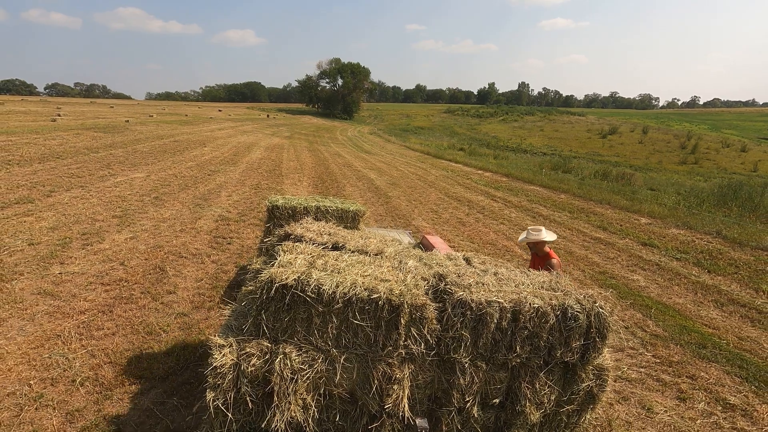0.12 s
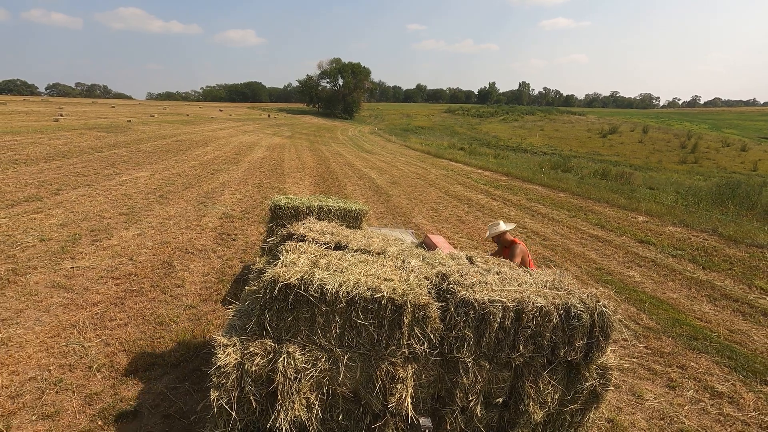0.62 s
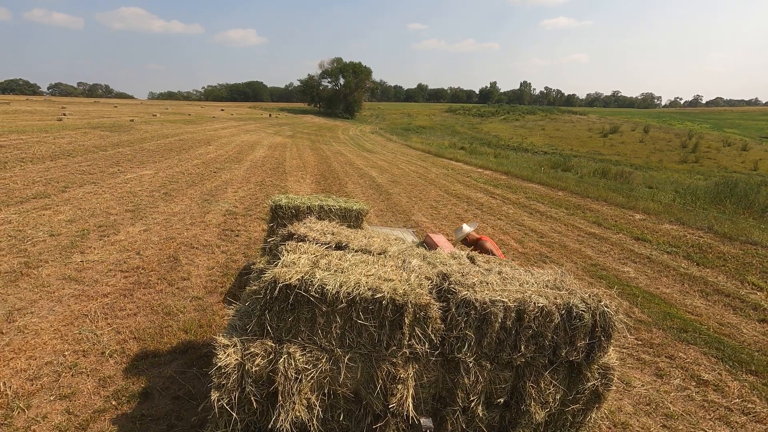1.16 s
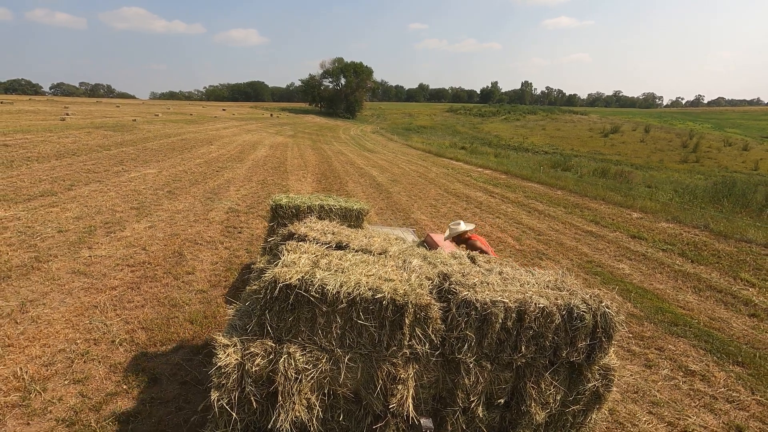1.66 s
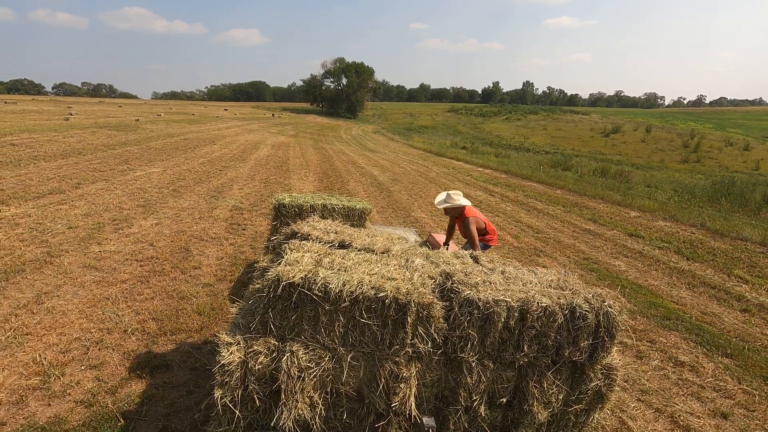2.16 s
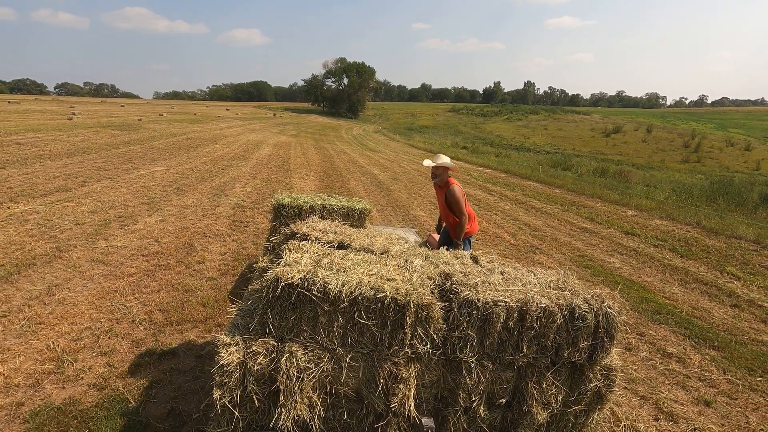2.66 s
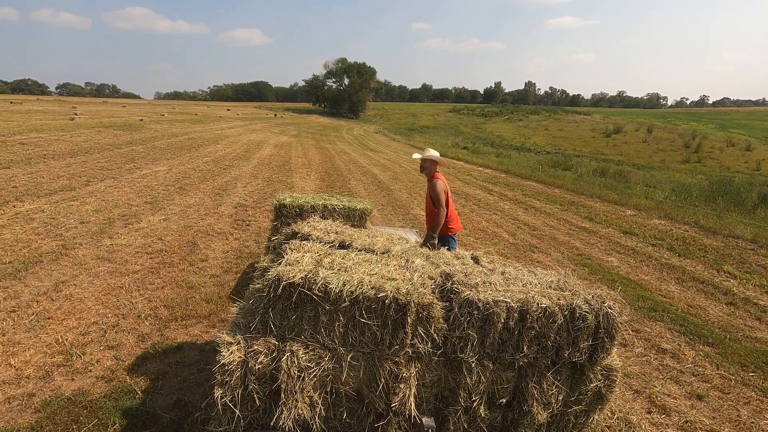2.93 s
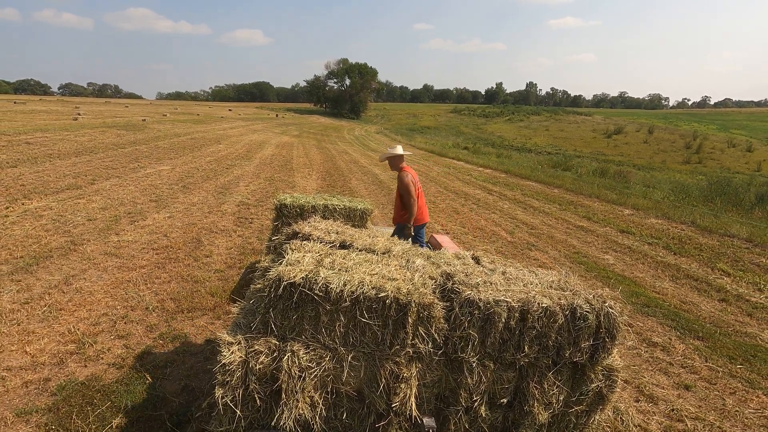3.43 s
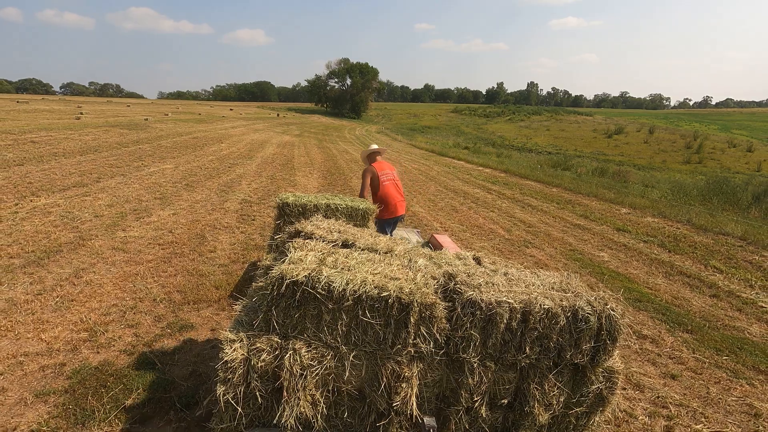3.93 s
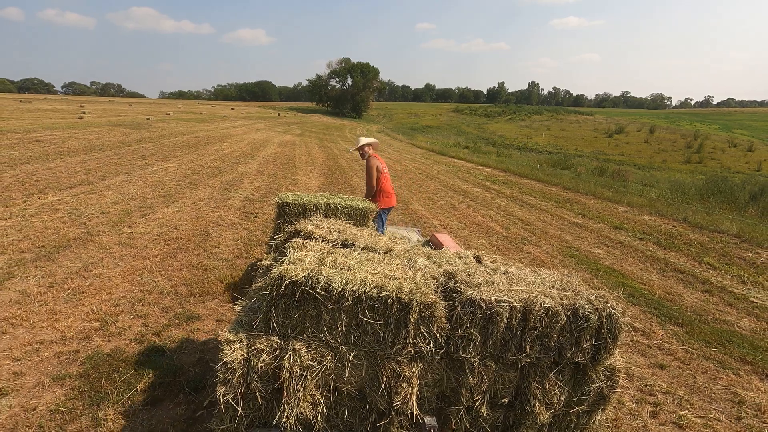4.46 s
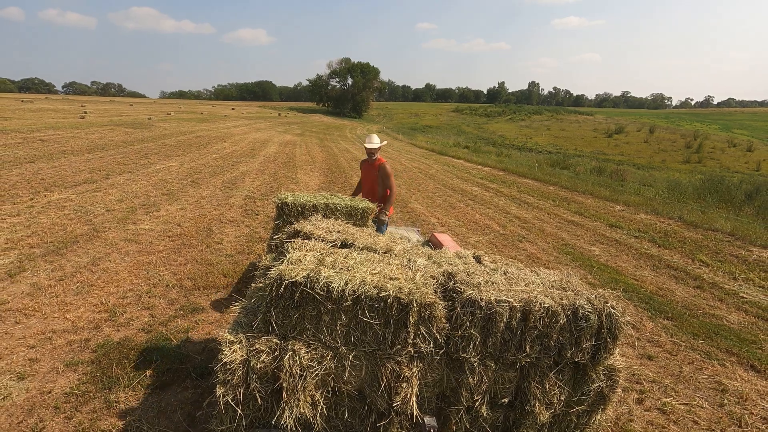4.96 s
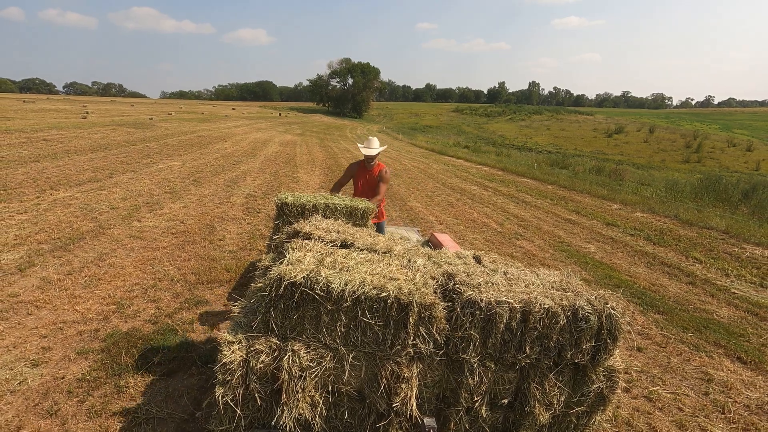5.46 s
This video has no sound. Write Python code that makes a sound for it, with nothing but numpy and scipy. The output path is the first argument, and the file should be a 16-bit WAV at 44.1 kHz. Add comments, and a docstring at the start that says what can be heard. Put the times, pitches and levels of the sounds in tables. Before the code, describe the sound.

Steady low diesel chug with knocking and clatter, wind rumbling in gusts, dry straw rustling and a few dull wooden thuds.

```python
"""A six-cylinder diesel tractor crawls across a stubble field at low revs, heard from on board.
A gust of low noise opens over the exhaust's firing harmonics, knocking block modes and fan hum and roar;
a wagon board rings at 0.6 s, hay crackles louder from 1 s and the wind gusts again near 1.8 and 4.1 s.
At 4.5 s the load pulls the engine down most, as boards ring and straw snaps in short noise bursts;
a last gust and wagon knock come near 5.5 s."""
import sys
import numpy as np
from scipy import signal
from scipy.fft import rfft, irfft
from scipy.io import wavfile

SR = 44100
rng = np.random.default_rng(int(sys.argv[2]) if len(sys.argv) > 2 else 0)


def wav_record(signal):
    """Record a signal, one row per channel, as 16-bit PCM in the file named by sys.argv[1]."""
    frames = np.transpose(np.atleast_2d(signal))
    bounded = np.clip(frames, -1, 1)
    # unit amplitude maps onto the largest positive 16-bit level
    quanta = np.round(bounded * 32767).astype(np.int16)
    wavfile.write(sys.argv[1], SR, quanta)


def volts(x):
    """Linear amplitude factor 10**(x/20) for a level x in dB, scalar or array-like."""
    e = np.asarray(x, float) / 20
    return 10 ** e


N = 246519  # samples


def rms_one(x):
    """Normalisation: scale a signal to unit rms."""
    return x / np.sqrt(np.mean(x ** 2) + 1e-30)


def colour(x, spectrum):
    """Linear filtering: weight the spectrum of x; unit white noise takes on the given dB per Hz."""
    hz, db = np.transpose(spectrum)
    bins_hz = np.maximum(np.arange(N // 2 + 1) * SR / N, 1)
    gain = volts(np.interp(np.log(bins_hz), np.log(hz), db))
    return irfft(rfft(x) * gain, N) * np.sqrt(SR / 2)


def drift(rate_hz):
    """Low-pass random process: slow chance of spread 1, from two equal poles at rate_hz."""
    pole = np.exp(-80 * np.pi * rate_hz / SR)  # runs at one value per 40 samples
    noise = rng.standard_normal(N // 40 + 2002)
    slow = signal.lfilter([1], [1, -2 * pole, pole * pole], noise)[2000:]
    return np.interp(np.arange(N) / 40, np.arange(len(slow)), rms_one(slow))


def swells(rows, rise_s, fall_s):
    """Superposition: bell-shaped swells at (peak time, height), summed to one value per sample."""
    rows = np.array(rows)
    lag = np.arange(N) / SR - rows[:, :1]
    return rows[:, 1] @ np.exp(-.5 * (lag / np.where(lag < 0, rise_s, fall_s)) ** 2)


def ring(clicks, hz, t60):
    """Damped resonance: a unit click sets a sine of height 1 ringing, down 60 dB after t60 seconds."""
    r, w = volts(-60 / (t60 * SR)), 2 * np.pi * hz / SR
    return signal.lfilter([0, np.sin(w)], [1, -2 * r * np.cos(w), r * r], clicks + 1e-18)


# Wind noise spectrum. Each row: frequency in Hz, relative density in dB per Hz.
WIND_SPECTRUM = [(10, -12), (30, 0), (55, -6), (130, -6.5), (250, -14), (1000, -70)]
# Gusts over a light breeze. Each row: peak time in seconds, rise above the breeze in dB,
# bell width (standard deviation) in seconds.
GUSTS = [(0, 11.5, 0.1), (1.8, 10, .22), (3.7, 4, 0.2), (4.12, 11.5, 0.14), (5.41, 11.5, 0.12)]


def wind():
    """Turbulent pressure at the microphone: lumpy low noise under slow random level changes."""
    breeze_db = -40.5
    width_s = np.array(GUSTS)[:, 2:]
    level_db = breeze_db + swells(GUSTS, width_s, width_s) + 2.0 * drift(2.1)
    return volts(level_db) * rms_one(colour(rng.standard_normal(N), WIND_SPECTRUM))


# Straw colouring. Each row: frequency in Hz, relative weight in dB.
STRAW = [(1500, -60), (3000, -30), (6000, -28), (8600, -28), (9450, -41), (9900, -35), (13900, -37),
         (14100, -43), (15200, -52)]
# The hay shifts. Each row: peak time in seconds, rise above the steady rustle in dB.
SHIFTS = [(.1, 5), (1.05, 9), (2.7, 9.5), (4.05, 4.5), (4.95, 7.5), (5.3, 3.5)]
# Straw snaps. Each row: start in seconds, level in dB ahead of the straw colouring.
SNAPS = [(0.5412, -61), (1.2092, -63), (1.5384, -61), (2.026, -60), (2.254, -62), (2.4928, -63),
         (3.205, -61), (3.4032, -61), (3.44, -63), (3.8445, -58), (4.3915, -56), (4.435, -61), (4.59, -62),
         (4.606, -63), (4.7611, -62), (4.8115, -58), (4.8544, -60), (4.9422, -63)]


def hay(grains_per_s=6000, spread_db=2.5, snap_decay_s=.004, crest_db=6):
    """Shot noise: stalks crackle densely in clumps; the loudest snap as short decaying noise bursts."""
    steady_db, rise_s, settle_s = -83, 0.16, 0.19  # level ahead of the straw colouring
    grain_db = spread_db * np.minimum(rng.exponential(1, N), 5)
    grains = (rng.random(N) < grains_per_s / SR) * volts(grain_db) * rng.choice([-1, 1], N)
    level_db = steady_db + swells(SHIFTS, rise_s, settle_s) + 3.5 * drift(22)
    rustle = volts(level_db) * rms_one(grains)
    starts = np.zeros(N)
    starts[[round(s * SR) for s, db in SNAPS]] = volts(np.array(SNAPS)[:, 1] - crest_db)
    envelope = signal.lfilter([1], [1, -np.exp(-1 / (snap_decay_s * SR))], starts)
    bursts = envelope * rng.standard_normal(N)
    return colour(rustle + bursts, STRAW)


# Short bursts of rustle. Each row: peak time in seconds, rms level at the peak in dB,
# centre frequency in Hz, bell width (standard deviation) in seconds.
PUFFS = [(1.612, -46, 3650, .011), (1.63, -57, 4800, .015), (2.03, -61, 5500, .006),
         (3.41, -59, 5300, .014), (3.445, -61, 5500, .012), (3.85, -58, 5400, .005),
         (4.613, -57, 5900, .008)]


def puffs(grains_per_s=5000):
    """Band-limited shot noise: soft-edged bursts of dense crackle, each in one band."""
    out, t = np.zeros(N), np.arange(N) / SR
    for s, db, hz, width_s in PUFFS:
        band = signal.butter(2, [hz / 1.22, hz * 1.22], "band", fs=SR, output="sos")
        grains = (rng.random(N) < grains_per_s / SR) * rng.standard_normal(N)
        crackle = rms_one(signal.sosfilt(band, grains + 1e-18))
        out += volts(db) * np.exp(-.5 * ((t - s) / width_s) ** 2) * crackle
    return out


# Dull knocks from the wagon bed. Each row: time of the blow in seconds, peak level in dB,
# mode frequency in Hz, 60 dB decay time in seconds.
THUDS = [(.63, -25, 850, .012), (4.598, -24.5, 390, .07), (4.69, -42, 1300, .15), (5.543, -26, 650, .018)]


def thuds(contact_s=0.0008):
    """Impact excitation: a soft blow of tone and noise sets one board ringing."""
    out, t = np.zeros(N), np.arange(N) / SR
    for s, db, hz, t60 in THUDS:
        force = np.cos(2 * np.pi * hz * t) + .5 * rng.standard_normal(N)
        blow = np.exp(-.5 * ((t - s) / contact_s) ** 2) * force
        rung = ring(blow, hz, t60)
        out += volts(db) * rung / np.abs(rung).max()
    return out


# The load tugs at the engine. Each row: time of the lowest speed in seconds, speed lost in rpm.
TUGS = [(.03, 11.5), (.81, 18), (1.72, 19.1), (2.22, 15), (2.69, 5.4), (3.67, 19.1), (4.5, 41.8),
        (5.13, 4.5), (5.58, 14)]


def crank_cycles():
    """Phase integration: summed crank speed gives four-stroke cycles, two turns each."""
    free_rpm, sag_s, recover_s = 736.5, .13, .16
    rpm = free_rpm - swells(TUGS, sag_s, recover_s)
    return np.cumsum(rpm) / 120 / SR


# Knocks within one cycle. Each row: position as a share of the cycle, relative strength in dB.
KNOCKS = [(.0, -46), (.133, -48.5), (.33, -51), (.495, -49), (.655, -53), (.685, -49), (.825, -51),
          (.855, -47.5)]


def knock_times(cycles, jitter_s=.0002):
    """Phase locking: the sample of every knock, cycle by cycle, and whether it falls within the scene."""
    turns = np.arange(int(cycles[-1]) + 1)[:, None] + np.array(KNOCKS)[:, 0]
    at = np.interp(turns, cycles, np.arange(N)) + SR * jitter_s * rng.standard_normal(turns.shape)
    return np.clip(at, 0, N - 1).astype(int), turns < cycles[-1]


# Air and machinery roar. Each row: frequency in Hz, density in dB per Hz ahead of level changes.
ROAR = [(15, -63), (60, -59.5), (125, -56.5), (160, -56), (205, -55), (240, -64), (310, -66), (350, -70),
        (400, -67.5), (1000, -73), (1300, -78), (2100, -83), (3200, -89.5), (5000, -94.3), (6800, -103.5),
        (8600, -102), (9450, -123), (9900, -126), (13900, -128), (15200, -138)]


def roar(at, heard, swell_db=43, fade_s=.004):
    """Amplitude modulation: broad noise whose middle range swells for a moment with each knock."""
    kicks = np.zeros(N)
    kicks[at] = heard * volts(np.array(KNOCKS)[:, 1] + swell_db)
    swell = signal.lfilter([1], [1, -np.exp(-1 / (fade_s * SR))], kicks)
    white = rng.standard_normal(N)
    middle_band = signal.butter(1, [700, 3500], "band", fs=SR, output="sos")
    middle = signal.sosfilt(middle_band, white)
    return colour((white + swell * middle) * volts(.55 * drift(9)), ROAR)


# The blade tone fades. Each row: time of the deepest fade in seconds, level change in dB.
FAN_FADES = [(2.25, -2), (3.45, -11), (4.6, -4)]


def fan(cycles, wobble_rad=.5):
    """Blade-passing tone, unsteady in turbulent air; a faint octave below beats slowly with the exhaust."""
    order = 32.17  # belt driven, so not a whole multiple of the cycle
    blade_rms_db, half_rms_db, half_phase_rad, fade_s = -34.5, -43, -2.34, 0.18
    blade_db = blade_rms_db + swells(FAN_FADES, fade_s, fade_s) + 1.2 * drift(22)
    blade = volts(blade_db) * np.cos(2 * np.pi * order * cycles + wobble_rad * drift(4.1))
    half = volts(half_rms_db) * np.cos(np.pi * order * cycles + half_phase_rad)
    return np.sqrt(2) * (blade + half)


# Valve gear contacts within one cycle. Each row: position as a share of the cycle, relative level in dB.
CONTACTS = [(0.031, -1), (.13, -6.5), (.19, -8), (.24, -4.5), (.325, -2), (0.397, -2), (0.508, -5.5),
            (0.6, 0.5), (.67, 4), (.74, -2.5), (.82, 0.5), (0.881, -4.5), (.975, 2)]
# Valve clatter spectrum. Each row: frequency in Hz, relative weight in dB.
VALVE_SPECTRUM = [(200, -30.5), (260, 0.5), (400, -9.5), (650, -4), (1000, -8.5), (1150, -24),
                  (1500, -40.5)]


def valves(cycles, count=600):
    """Periodic excitation: each contact is a short rattle tied to the crank angle, alike in every cycle."""
    width_share, rms_db = .014, -41.5  # bell width of a contact as a share of the cycle
    contacts = np.array(CONTACTS)
    share = np.arange(count) / count
    lag = (share - contacts[:, :1] + .5) % 1 - .5  # wraps round the cycle
    envelope = volts(contacts[:, 1]) @ np.exp(-.5 * (lag / width_share) ** 2)
    pattern = envelope * rng.standard_normal(count)
    looped = np.interp(cycles % 1, share, pattern, period=1)
    return volts(rms_db) * rms_one(colour(looped, VALVE_SPECTRUM))


# Block and bonnet modes. Each row: frequency in Hz, relative level in dB, 60 dB decay time in seconds.
BLOCK_MODES = [(324, 0, 0.11), (383.5, 6, 0.058), (455.5, 4.5, 0.06), (489.4, 3, 0.079),
               (564.6, -2.5, 0.12), (649.4, 4, 0.067), (767, 2, 0.085), (842.5, -1, 0.079), (938, 4, 0.055),
               (1001, 4, 0.079), (1126, -8, 0.13), (1195, -8.5, 0.095), (1290, -6.5, 0.1),
               (1730, -7.5, 0.073), (1790, -19, 0.055), (1890, -13.5, 0.11), (2152, -8.5, 0.08),
               (2510, -16.5, 0.11), (2870, -17.5, 0.09), (3000, -21.5, 0.14), (6150, -30, 0.11),
               (7690, -32, 0.062)]


def block(at, heard, shake_db=-72):
    """Modal excitation: each knock strikes the modes in its own way; gears and valves shake them between."""
    out = np.zeros(N)
    strength_db = np.array(KNOCKS)[:, 1]
    for hz, db, t60 in BLOCK_MODES:
        own = volts(3 * rng.standard_normal(len(KNOCKS))) * rng.choice([-1, 1], len(KNOCKS))
        clicks = volts(shake_db + db) * rng.standard_normal(N)
        clicks[at] += heard * own * volts(strength_db + db + 2 * rng.standard_normal(at.shape))
        out += ring(clicks, hz, t60)
    return out


# Firing tone level over time. Each row: time in seconds, level in dB rms.
FIRING_LEVEL = [(0, -23), (.12, -21), (.4, -23.5), (1.54, -23), (1.71, -27.5), (1.86, -23), (3.4, -22.5),
                (3.66, -26.5), (3.82, -20.5), (4.4, -25), (4.8, -21.5), (5.05, -23.5), (5.27, -21.5),
                (5.38, -28), (5.5, -23.5), (5.59, -24)]
# Weaker exhaust tones. Each row: multiple of the four-stroke cycle rate, mid level in dB rms.
WEAK_TONES = [(3, -50), (5, -47), (7, -45), (8, -53), (9, -43), (10, -40), (11, -38), (13, -46), (14, -48),
              (15, -51), (16, -34), (18, -32), (19, -52), (20, -47), (22, -47), (24, -44), (28, -44),
              (30, -49), (33, -50), (34, -44), (36, -51), (42, -52), (44, -56), (46, -56), (48, -50),
              (53, -56), (62, -51), (64, -52), (66, -53), (72, -53), (75, -55), (80, -54)]


def exhaust(cycles, waver_db=1.6):
    """Harmonic series: even firing gives multiples of six; unequal cylinders add the tones between."""
    offset_rad, start_rad, bend_rad = .82, .51, 1.05  # pipe phase, curving with the order
    uneven_lag_rad = 1.75  # the tones between the firing multiples come later
    firing_db = np.interp(np.arange(N) / SR, *np.transpose(FIRING_LEVEL))
    octave_db = -21.5 + 1.06 * drift(3.5)
    tones = [(6, firing_db), (12, octave_db)]
    tones += [(order, db + waver_db * drift(4)) for order, db in WEAK_TONES]
    out = np.zeros(N)
    for order, db in tones:
        multiple = order / 6
        phase = offset_rad + start_rad * multiple + bend_rad * multiple ** 2
        phase -= uneven_lag_rad * (order % 6 > 0)
        out += np.sqrt(2) * volts(db) * np.cos(2 * np.pi * order * cycles + phase)
    return out


def scene():
    """Superposition of sources: everything on the engine follows one crank angle."""
    cycles = crank_cycles()
    at, heard = knock_times(cycles)
    surroundings = wind() + hay() + puffs() + thuds()
    engine = roar(at, heard) + fan(cycles) + valves(cycles) + block(at, heard) + exhaust(cycles)
    return (surroundings + engine)[None]


def band_limit(x):
    """A steep low-pass at the top of the band."""
    return signal.sosfilt(signal.butter(12, 15140, fs=SR, output="sos"), x)


def record(dry):
    """Transducer limits: the microphone drops the deepest bass and its input rounds the peaks."""
    ceiling = .6  # where the input saturates
    miked = signal.sosfilt(signal.butter(1, 4, "high", fs=SR, output="sos"), dry)
    finished = ceiling * np.tanh(miked / ceiling)
    return band_limit(finished)


dry = scene()
out = record(dry)
wav_record(out)
```